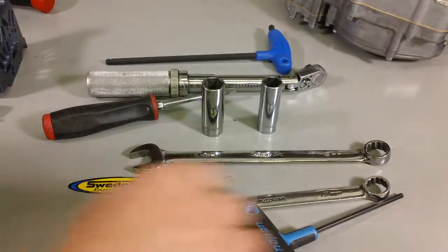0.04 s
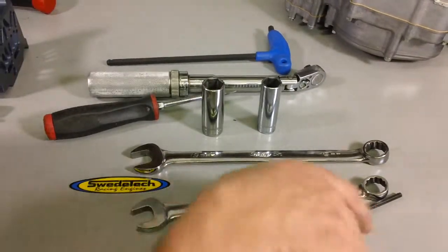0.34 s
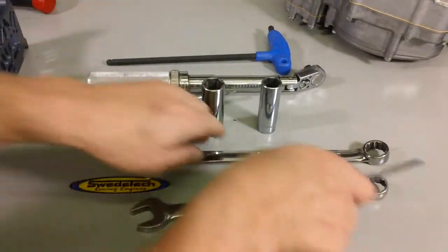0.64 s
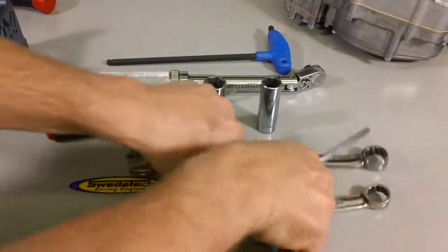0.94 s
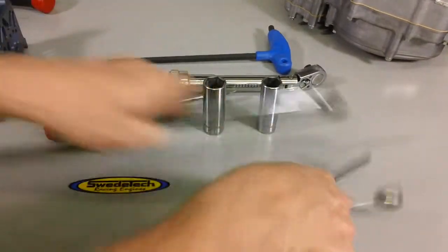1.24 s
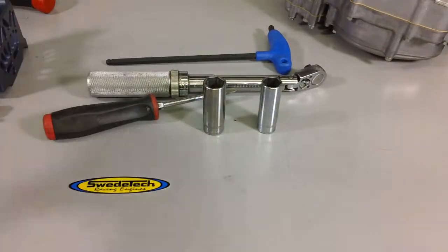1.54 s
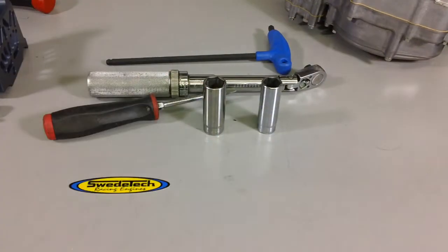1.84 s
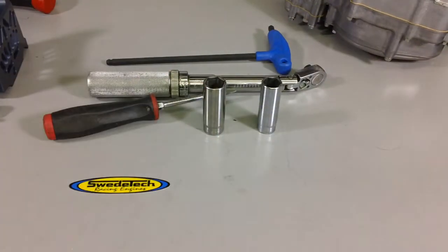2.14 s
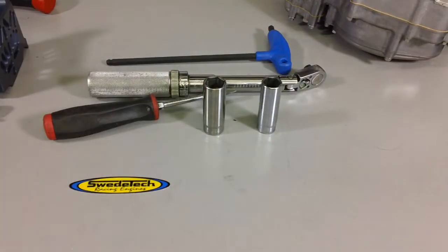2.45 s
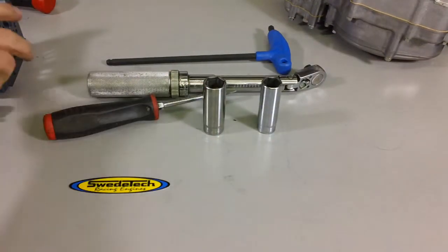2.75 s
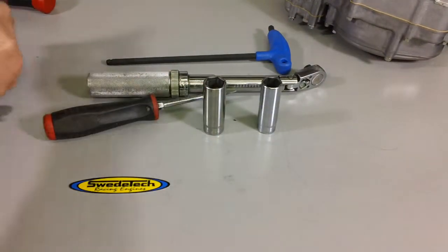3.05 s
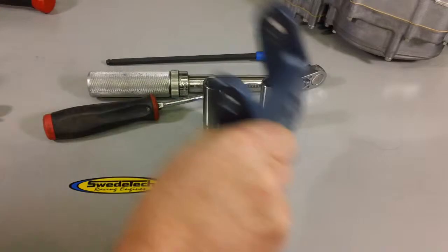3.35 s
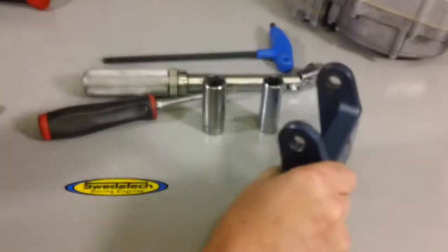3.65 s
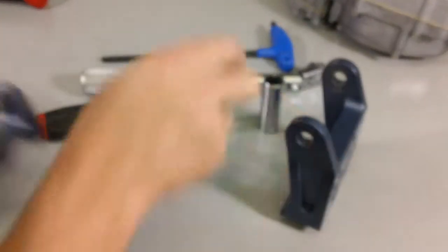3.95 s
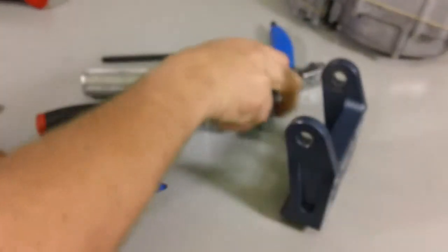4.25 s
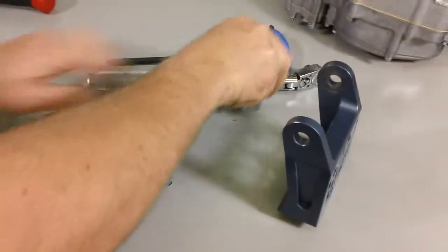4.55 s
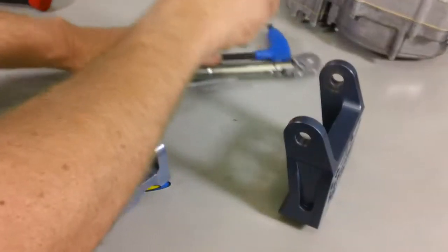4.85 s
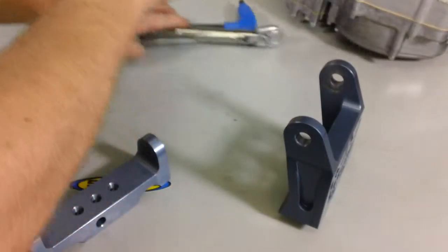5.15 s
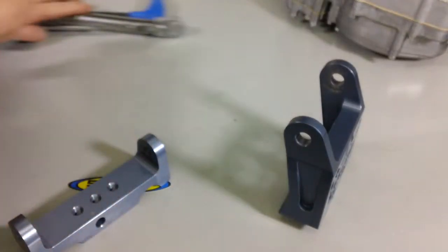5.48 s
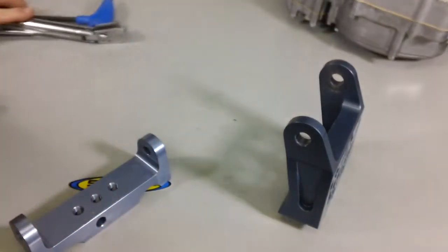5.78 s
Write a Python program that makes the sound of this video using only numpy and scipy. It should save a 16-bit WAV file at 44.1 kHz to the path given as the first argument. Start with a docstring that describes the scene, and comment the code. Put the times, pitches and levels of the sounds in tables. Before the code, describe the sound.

Heard close up in a slightly echoing garage, steel tools are cleared off a workbench. Light clinks and a short scrape lead to a bright, ringing clatter of dropped wrenches. After a pause, a metal bracket lands with a hollow thump. Sharp socket clacks and a rasping drag of tools follow, ending in another thud. Soft air noise and occasional faint ticking lie underneath.

```python
"""Hand tools are cleared off a laminated workbench in a garage. First two wrenches slide off the top,
scraping in many tiny slips. They are dropped to one side, where they bounce, ring and rock to rest.
Next a metal bracket is set down, thumping the bench and ringing. Then sockets clack together in the
hand while the other tools are dragged away, and last a second bracket lands. All along the walls
echo, over soft air noise and a few runs of faint ticking."""
import sys
import numpy as np
from scipy import signal
from scipy.fft import rfft, irfft, next_fast_len
from scipy.io import wavfile
from scipy.ndimage import map_coordinates

SR = 44100
rng = np.random.default_rng(int(sys.argv[2]) if len(sys.argv) > 2 else 0)


def output_pcm(signal):
    """Save a mono or channel-first signal as 16-bit PCM at the path in sys.argv[1].

    Samples are clipped to [-1, 1] before scaling.
    """
    pcm = np.clip(np.atleast_2d(signal).T, -1, 1) * 32767
    wavfile.write(sys.argv[1], SR, np.round(pcm).astype(np.int16))


N = 256476

# Metal landing. Thud (bass) and hardness (treble) count from the level; a fade, or t60, is a 60 dB fall.
# (time [s], level [dB], thud [dB], hardness [dB], fade [s])
LANDINGS = [(1.054, 12.5, 2, -20, 0.077), (1.073, 13.5, 1, -14, .06), (1.101, 22, 4.5, -12.5, .044),
            (1.191, 5, 2.5, -26, .06), (1.87, 24.5, -0.5, -1.5, 0.026), (1.919, 14.5, -5, -7, 0.04),
            (1.942, 14.5, -5, -2.5, 0.064), (1.971, 25, 0, -5, .049), (1.986, 22, -6, -9, .1),
            (2.061, 22, -2, -7, .057), (2.097, 13.5, -1, -5, .07), (2.175, 25, -11, -5, 0.041),
            (2.234, 21, -5.5, 1.5, .041), (2.264, 15, -5, 0, .046), (2.952, -2.5, 11.5, -38, .084),
            (3.31, -1, 6, -34, .1), (3.631, 26.5, -3, -18.5, .07), (4.32, 30, -7.5, -15.5, .074),
            (4.424, 13.5, 2.5, -12, .12), (4.775, 12, 4, -12, .05), (5.702, 27.5, 1.5, -21, .1)]
# pitches the bench top boosts: (pitch [Hz], width [Hz], boost [dB])
BENCH_RESONANCES = [(99, 11, 9.5), (277.7, 20, 6), (360, 28, 0), (459, 53, 3), (614.5, 85, 4),
                    (757, 175, 2.5), (939, 41, 4.5), (1261, 51, 4), (1370, 73, 3), (1990, 76, 3)]
# how each kind of rubbing dies away: (name, fade [s])
RUB_FADE_S = {"slide": 0.22, "skitter": .35, "drag": 0.28, "groan": 0.24, "rasp": .3}


def landings():
    """Metal lands and sets the bench top knocking; stronger blows start with a sharper push."""
    out = np.zeros(N)
    for s, db, thud_db, hardness_db, t60 in LANDINGS + rocking():
        click_db = -34.5 + 0.51 * db + 0.23 * hardness_db  # strong, hard blows click more
        tone = [(30, thud_db - 34), (150, thud_db - 5.5), (260, thud_db), (600, -0.28), (1200, -0.29),
                (2500, hardness_db - .5), (6500, click_db - 3.5), (15000, click_db - 19)]
        push = contact(t60, snap=.03 * (db - 11), spiky_db=3.5)
        add(out, s, amp(db) * colour(push, tone, BENCH_RESONANCES))
    return out


def rocking(start_s=2.35, hop_s=.062, shrink=0.63, loss_db=2.5):
    """Three more landings: the last wrench rocks to rest, each hop shorter and weaker."""
    times = [start_s + hop_s * (1 - shrink ** k) / (1 - shrink) for k in range(3)]
    return [(s, 16 - loss_db * k, -3.5, -7, 0.036) for k, s in enumerate(times)]


def wrench_rings():
    """A dropped wrench rings at its own high pitches, called modes."""
    # blows: (time [s], level [dB], favoured pitch [Hz], spread [octaves], damped after [s])
    strikes = [(1.871, -46, 14400, 0.066, 0.044), (1.972, -43.5, 14300, .08, .02),
               (2.025, -36, 7600, 0.36, 0.2), (2.183, -21, 8500, 3.3, 0.13),
               (2.238, -27.5, 8700, 0.032, 0.074), (2.24, -39, 6000, 0.89, .25),
               (2.297, -32.5, 9800, 0.13, 0.024), (2.337, -33.5, 7000, .1, 0.0089),
               (2.462, -44, 9420, .04, 0.067), (2.464, -45.5, 9000, 1.1, 0.15)]
    # wrench modes: (pitch [Hz], level [dB], fade [s])
    modes = [(3031, -14, .4), (4797, -14, .5), (5040, 0, .5), (5245, -3, .48), (5625, -8, .5),
             (6500, -17, .5), (7033, -1, .55), (8280, -11, .5), (8650, -12, .4), (9324, -15, .45),
             (9518, -15, .45), (10600, -19, .5), (11140, -15, .5), (11655, -9, .5), (11914, -9, .45),
             (13010, -14, .38), (14116, -13, .4), (14395, -10, .45)]
    return ringing(strikes, modes, rise_s=.0015, scatter_db=.8)


def bench_thumps():
    """Things set down flat make the bench top ring low."""
    # blows: (time [s], level [dB], favoured pitch [Hz], spread [octaves], damped after [s])
    strikes = [(.284, -34.5, 945, 0.16, .05), (.447, -34.5, 870, 0.46, .05), (3.631, -1.5, 398, 1.6, .12),
               (5.702, -26, 635, 0.22, .1)]
    # low bench modes: (pitch [Hz], level [dB], fade [s])
    modes = [(48, -25, .05), (241, -8.5, 0.18), (273, 4.5, 0.087), (333, -8, 0.11), (391, -1, .11),
             (420, -5.5, .08), (498, -10, 0.21), (627, -10, 0.097), (784, -5.5, 0.15), (960, -5, 0.11)]
    return ringing(strikes, modes, rise_s=.0005, scatter_db=.5)


def bracket_ring():
    """The first bracket rings on after landing."""
    # blow: (time [s], level [dB], favoured pitch [Hz], spread [octaves], damped after [s])
    strikes = [(3.631, -49, 3200, 0.46, 0.27)]
    # bracket modes: (pitch [Hz], level [dB], fade [s])
    modes = [(1460, 0, 0.37), (1810, 0, 0.23), (2245, -13, 0.57), (2440, -4, 0.31), (3090, -19, 1.8),
             (4100, -10, 0.24)]
    return ringing(strikes, modes, rise_s=.0006, scatter_db=.8)


def clacks():
    """Tools knock together with a bright buzz that the hand cuts short."""
    # knocks: (time [s], level [dB], click against the level [dB], fade [s])
    knocks = [(.14, -19.5, 4, 0.11), (.446, -4, 4, 0.066), (1.33, -19.5, 2, 0.0063),
              (2.023, -1, -1.5, 0.088), (2.169, 10.5, -19, 0.013), (2.461, -12, 7, .11),
              (2.875, -9, -12, 0.12), (4.322, 9, -2.5, 0.028), (4.345, 9, -4.5, 0.029),
              (4.725, 2.5, -1.5, 0.024), (4.732, 3, -1.5, .044), (4.797, 10, -6, 0.028),
              (4.857, 14, -14.5, 0.05), (4.872, 15.5, -29, 0.041), (4.891, 20, -13, 0.073),
              (4.926, -1, 0, 0.017), (5.544, 6, -11, 0.043), (5.745, -1, -6.5, 0.12)]
    out = np.zeros(N)
    for s, db, click_db, t60 in knocks:
        tone = [(60, -20.0), (600, -1.5), (1400, 7.5), (2500, -1.5),
                (7000, click_db + 2.5), (10500, click_db - 3), (15000, click_db - 22.5)]
        push = contact(t60, snap=0.18, spiky_db=5)
        add(out, s, amp(db) * colour(push, tone))
    return out


def socket_chimes():
    """Light touches make sockets and other small steel parts chime."""
    # touches: (time [s], level [dB], favoured pitch [Hz], spread [octaves], damped after [s])
    touches = [(.446, -29.5, 7500, 1.1, .12), (1.102, -47, 4850, 0.045, .1), (2.9, -53, 7000, .09, .05),
               (3.632, -40, 9600, 0.066, .05), (4.345, -41, 14600, .1, 0.0092),
               (4.426, -42.5, 4800, .05, 0.044), (4.926, -28, 4860, 0.037, 0.0039),
               (5.544, -40, 9500, 0.078, .01), (5.746, -29, 5400, 0.21, .005),
               (5.751, -48, 14500, .1, 0.034)]
    # socket modes: (pitch [Hz], level [dB], fade [s])
    modes = [(2460, -14, .14), (4860, -18, .3), (5276, -4, .25), (5420, -4, .12), (5674, 0, .15),
             (7068, -14, .2), (8323, -1, .25), (8800, -7, .12), (9400, -6, .12), (9550, -2, .11),
             (14200, -6, .18), (14600, -5, .1)]
    return ringing(touches, modes, rise_s=.0006, scatter_db=.8)


def drags(grit_db=-17.5):
    """Dragged tools rumble through the bench with a gritty hiss, losing force as they go."""
    # pulls: (start [s], swell [s], length [s], level [dB])
    pulls = [(2.87, 0.014, .06, -42.5), (4.16, 0.0192, 0.044, -47), (4.23, 0.023, 0.14, -31),
             (4.71, .12, 1.1, -24.5)]
    # tone of the rumble and of the grit: (pitch [Hz], level [dB])
    rumble_tone = [(29, -65), (50, -56), (96, -12), (216, -5.5), (257, -4.5), (408, -9), (771, -8.5),
                   (1490, -18), (1980, -20.5), (5000, -35), (6500, -71), (11000, -120)]
    grit_tone = [(1500, -28), (3500, 3.5), (5500, 4.5), (10000, -0.5), (12500, -15), (15000, -14)]
    rumble = unit(colour(friction(rate=4000, size_db=1.5, uneven_db=1), rumble_tone, BENCH_RESONANCES))
    grit = unit(colour(friction(rate=7500, size_db=3.0, uneven_db=0.5), grit_tone))
    return strokes(pulls, RUB_FADE_S["drag"], sag_db_per_s=7) * (rumble + amp(grit_db) * grit)


def rasps():
    """Steel rasps when a dragged tool bears down."""
    # presses: (start [s], swell [s], length [s], level [dB])
    presses = [(4.215, 0.086, 0.11, -28), (4.4, 0.034, 0.035, -37), (4.95, 0.11, .24, -26),
               (5.5, 0.022, 0.21, -34)]
    # tone of the rasp: (pitch [Hz], level [dB])
    tone = [(250, -31), (700, 2.5), (1300, 1), (2200, -6), (3500, -12.5), (6000, -38)]
    # tool modes: (pitch [Hz], width [Hz], boost [dB])
    modes = [(727, 140, 19), (1062, 83, 12), (1450, 50, 17), (1670, 50, 8), (2000, 55, 12), (3400, 71, 15)]
    slips = friction(rate=5400, size_db=1.5, uneven_db=1.5)
    return strokes(presses, RUB_FADE_S["rasp"]) * catching(slips, tone, modes, catch_db=2.0)


def slides():
    """Sliding wrenches shake the bench and sing with their own modes."""
    # pushes: (start [s], swell [s], length [s], level [dB])
    pushes = [(.79, 0.017, 0.043, -42.5), (.857, 0.024, 0.16, -28.5), (1.04, 0.016, 0.083, -39),
              (3.1, 0.094, .22, -53)]
    # tone of the slide: (pitch [Hz], level [dB])
    tone = [(59, -51), (100, -32), (258, -1), (362, -8.5), (791, -0.5), (1920, -16.5), (2130, -12),
            (3050, -21.5), (3390, -22.5), (6390, -28), (9540, -31), (14500, -42.5), (15500, -38.5)]
    # sliding wrench modes: (pitch [Hz], width [Hz], boost [dB])
    modes = [(966, 55, 12.5), (2240, 58, 14), (3460, 120, 21), (9460, 390, 19), (14600, 500, 26)]
    slips = friction(rate=3000, size_db=0.5, uneven_db=2.5)
    return strokes(pushes, RUB_FADE_S["slide"]) * catching(slips, tone, modes, catch_db=2.6)


def skitters():
    """A dropped wrench skids briefly and shakes the bench."""
    # skids: (start [s], swell [s], length [s], level [dB])
    skids = [(2.175, 0.006, 0.058, -26), (2.22, 0.019, 0.034, -16.5)]
    # tone of a skid: (pitch [Hz], level [dB])
    tone = [(100, -14), (300, -9), (1200, 0.5), (2500, -2.5), (4500, -10.5), (7000, -22), (15000, -34)]
    slips = friction(rate=4000, size_db=1.5, uneven_db=2.0)
    return strokes(skids, RUB_FADE_S["skitter"]) * unit(colour(slips, tone, BENCH_RESONANCES))


def groans():
    """Rubbing makes the bench give a low groan."""
    # rubs: (start [s], swell [s], length [s], level [dB])
    rubs = [(.712, 0.017, 0.041, -32), (5.38, .09, 0.1, -32.5)]
    # tone of the groan: (pitch [Hz], level [dB])
    tone = [(100, -46), (220, -16.5), (255, -7), (295, 3), (400, -17.5), (900, -24), (3000, -46.5)]
    slips = friction(rate=1700, size_db=-3.5, uneven_db=1.5)
    return strokes(rubs, RUB_FADE_S["groan"]) * unit(colour(slips, tone))


def garage_echo(x, delay_s=.007):
    """The walls throw the sound back; the treble dies first."""
    # length of the echo: (pitch [Hz], fade [s])
    fades = [(100, 0.83), (300, 0.61), (1500, 0.56), (5000, 0.34), (14000, 0.21)]
    hz, t, noise = signal.stft(rng.standard_normal(SR * 3 // 4), SR, nperseg=256)
    tail = signal.istft(noise * amp(-60 * t / along(fades, hz)[:, None]), SR, nperseg=256)[1]
    echo = np.pad(tail / np.linalg.norm(tail), (round(delay_s * SR), 0))
    return signal.fftconvolve(x, echo)[:N]


def ticking(period_s=.059, jitter_s=.002):
    """A faint, thin tick repeats in short runs."""
    # runs of ticks: (start [s], end [s], level [dB])
    runs = [(0.069, .37, -20), (1.629, 1.76, -21), (2.999, 3.62, -25.5)]
    out = np.zeros(N)
    for start, end, db in runs:
        for s in np.arange(start, end, period_s):
            when = s + jitter_s * rng.standard_normal()
            add(out, when, amp(db) * contact(t60=0.007, snap=0.28, spiky_db=-1))
    return colour(out, [(2500, -24), (4000, 11.5), (4700, -1), (5500, 5.0), (7500, -19.5)])


def garage_air(level_db=-47.5, loud_db=22.8, depth_db=7, hold_s=0.57, recover_db_per_s=7.5):
    """Soft air noise that dips after each loud landing, stays down, then creeps back."""
    # tone of the air: (pitch [Hz], level [dB])
    tone = [(15, -37), (25, -35), (53, -2.5), (289, -1), (322, -2.5), (445, -3.5), (582, -7), (782, -8.5),
            (848, -9.5), (1530, -14), (4040, -20), (9810, -25), (12500, -36.5), (15500, -27)]
    t, dip_db = np.arange(N) / SR, np.zeros(N)
    for s, db, *_ in LANDINGS:
        if db > loud_db:
            recovered_db = recover_db_per_s * np.maximum(t - s - hold_s, 0)
            dip_db = np.maximum(dip_db, (t > s) * (depth_db - recovered_db))
    return amp(level_db - dip_db) * unit(colour(rng.standard_normal(N), tone))


def contact(t60, snap, spiky_db, settle_s=0.0012):
    """The force of a hit: one sharp push holding the share snap of the energy, then dying chatter."""
    t = np.arange(SR // 4) / SR
    chatter = rng.standard_normal(len(t))
    chatter *= amp(spiky_db * rng.standard_normal(len(t)) - 60 * t / t60)
    chatter *= 1 - np.exp(-t / settle_s)
    share = np.clip(snap, 0, 1)
    force = chatter * np.sqrt(1 - share) / np.linalg.norm(chatter)
    force[0] = np.sqrt(share)
    return force


def ringing(strikes, modes, rise_s, scatter_db, damped_t60=0.12, detune=0.00056):
    """Each strike favours the modes near one pitch; they die faster once the part lies flat or is held."""
    out, t = np.zeros(N), np.arange(SR * 3 // 4) / SR
    hz, mode_db, t60 = np.transpose(modes)[:, :, None]
    signs = (-1) ** np.arange(len(hz))[:, None]  # neighbouring modes swing opposite ways
    for s, db, centre_hz, spread, free_s in strikes:
        gains = amp(mode_db + scatter_db * rng.standard_normal(hz.shape))
        gains *= np.exp(-.5 * (np.log2(hz / centre_hz) / spread) ** 2)
        # the contact shifts each pitch a little, so overlapping rings waver
        shifted_hz = hz * (1 + detune * rng.standard_normal(hz.shape))
        waves = signs * np.sin(2 * np.pi * shifted_hz * t) * amp(-60 * t / t60)
        shape = (1 - np.exp(-t / rise_s)) * amp(-60 * np.maximum(t - free_s, 0) / damped_t60)
        add(out, s, amp(db) * shape * (gains * waves).sum(0) / (np.linalg.norm(gains) + 1e-12))
    return out


def friction(rate, size_db, uneven_db):
    """Tiny slips of random size, about rate a second, swelling with the uneven pull of the hand."""
    slips = (rng.random(N) < rate / SR) * rng.standard_normal(N)
    slips *= amp(size_db * rng.standard_normal(N))
    return slips * amp(uneven_db * wobble(45))


def catching(slips, tone, modes, catch_db):
    """The touching point wanders, so two sets of modes take hold and let go."""
    sets = [unit(colour(slips, tone, BENCH_RESONANCES + modes[k::2])) for k in range(2)]
    return unit(sum(sound * amp(catch_db * wobble(14)) for sound in sets))


def strokes(rows, fade_s, sag_db_per_s=0):
    """Loudness of rubbing strokes: each swells, holds or sags, then dies away."""
    gain = np.zeros(N)
    for start, swell, length, db in rows:
        t = np.maximum(np.arange(N) / SR - start, 0)
        fallen_db = sag_db_per_s * t + 60 * np.maximum(t - length, 0) / fade_s
        gain += np.minimum(t / swell, 1) ** 2 * amp(db - fallen_db)
    return gain


def colour(x, tone, modes=(), size=8192):
    """Filter x with a smooth tone of (pitch [Hz], level [dB]) points and with ringing modes."""
    hz = np.fft.rfftfreq(size, 1 / SR)
    boost_db = sum(db / (1 + (2 * (hz - centre) / width) ** 2) for centre, width, db in modes)
    cepstrum = irfft(np.log(amp(along(tone, hz) + boost_db)))
    # fold the second half onto the first, so the ringing comes after a hit and never before
    cepstrum[1:size // 2] *= 2
    cepstrum[size // 2 + 1:] = 0
    response = irfft(np.exp(rfft(cepstrum)))[:size // 2]
    return signal.fftconvolve(x, response)[:len(x)]


def amp(db):
    """Turn decibels into a gain."""
    return 10 ** (np.asarray(db) / 20)


def unit(x):
    """Scale x to an average (rms) level of 1."""
    return x / np.sqrt(np.mean(x ** 2) + 1e-20)


def along(points, hz):
    """Join (pitch [Hz], value) points on a log pitch scale and read off at hz."""
    pitches, values = np.transpose(points)
    return np.interp(np.log(hz + 1), np.log(pitches + 1), values)


def add(track, s, sound):
    """Mix a sound into the track from time s."""
    part = track[round(s * SR):][:len(sound)]
    part += sound[:len(part)]


def wobble(rate):
    """A smooth curve through rate random points a second."""
    points = rng.standard_normal(int(N * rate / SR) + 4)
    return map_coordinates(points, [np.arange(N) * rate / SR])


def scene():
    """Everything on the bench, with the garage behind it, in one channel."""
    rings = bench_thumps() + wrench_rings() + socket_chimes()
    handling = landings() + clacks() + slides() + rasps() + skitters() + groans() + drags()
    rings += bracket_ring()
    echo = garage_echo(amp(-12.5) * handling + amp(-16.5) * rings)
    return (handling + rings + echo + ticking() + garage_air())[None]


def record(dry, top_hz=15500):
    """Round off the loudest peaks and remove the highest treble."""
    clipped = dry / (1 + np.abs(dry) ** 6) ** (1 / 6)
    size = next_fast_len(N + SR // 4)
    kept = np.fft.rfftfreq(size, 1 / SR) < top_hz
    return irfft(rfft(clipped, size) * kept, size)[:, :N]


dry = scene()
out = record(dry)
output_pcm(out)
```